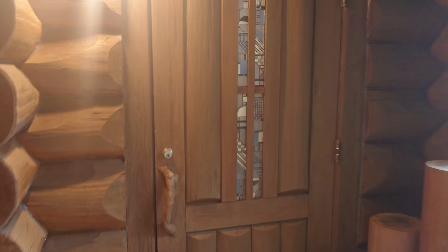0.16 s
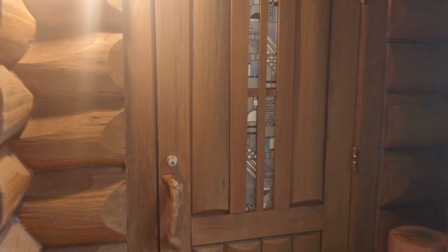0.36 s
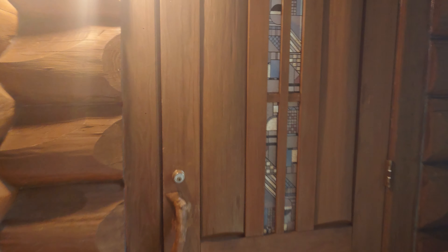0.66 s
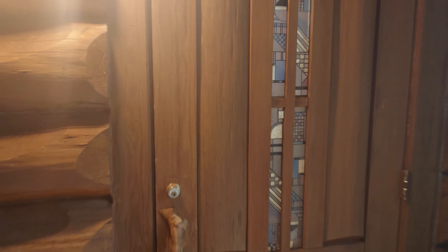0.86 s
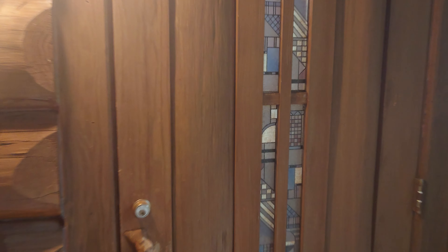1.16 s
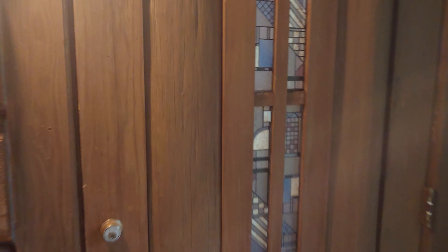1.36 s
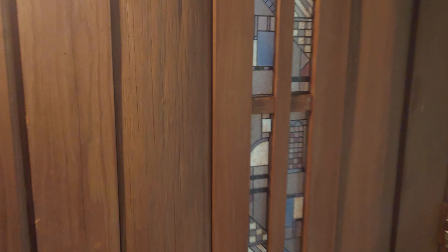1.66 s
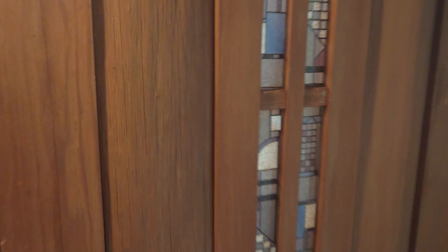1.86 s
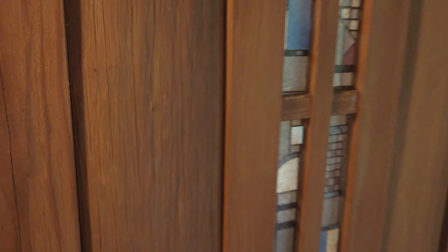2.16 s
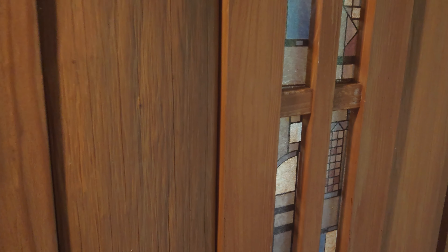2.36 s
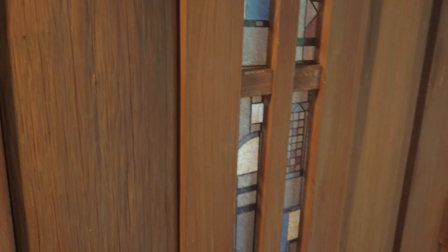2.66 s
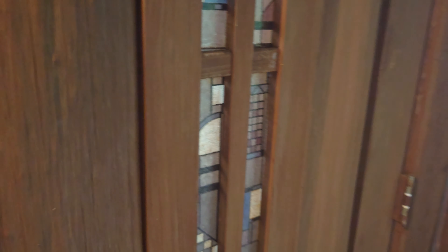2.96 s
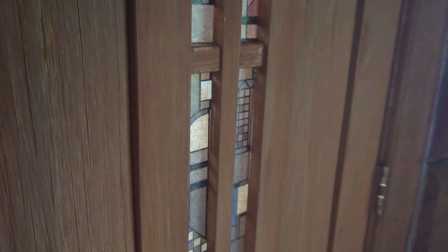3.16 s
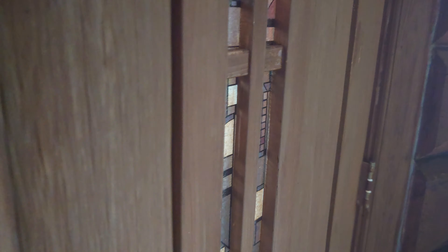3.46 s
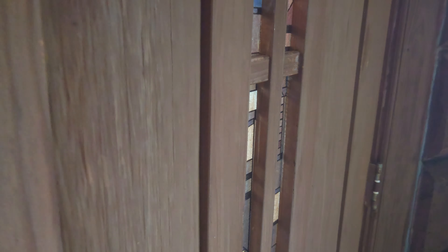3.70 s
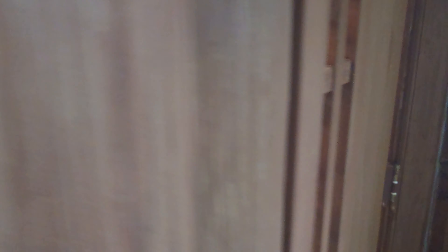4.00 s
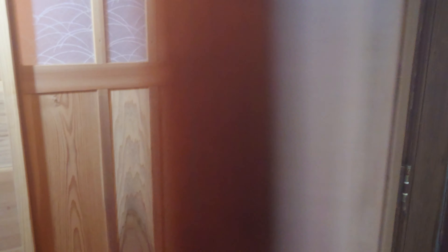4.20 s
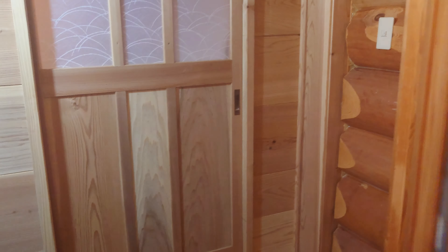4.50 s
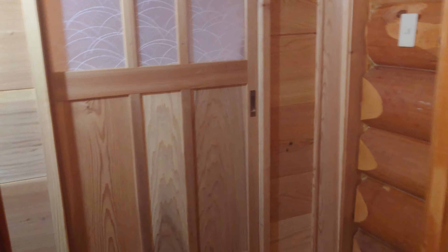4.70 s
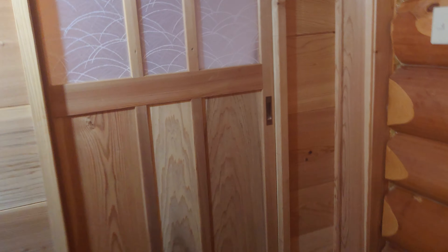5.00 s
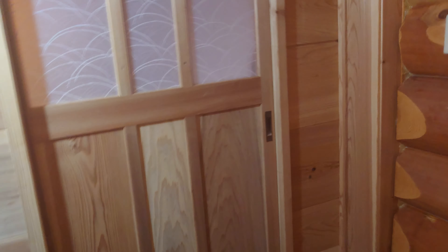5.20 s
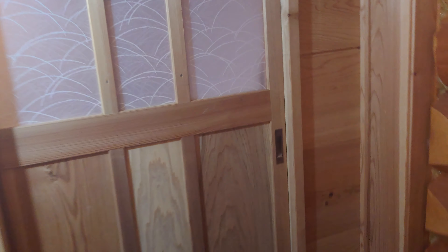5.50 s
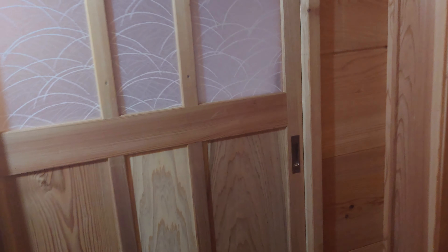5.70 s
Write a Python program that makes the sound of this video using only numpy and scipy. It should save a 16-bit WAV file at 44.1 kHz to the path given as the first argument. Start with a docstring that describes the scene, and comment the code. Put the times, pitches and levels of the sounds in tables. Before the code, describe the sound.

Someone in boots crosses a hollow plank deck, rattles a door latch, opens a briefly squeaking wooden door and steps on with scuffs and knocks.

```python
"""Boots on a cabin porch

Someone in boots walks over a plank porch, works a latch and pulls a heavy wooden door open.
Shaped noise makes knocks, scuffs, latch clatter and rustling clothes; low resonances boom as the deck.
Struck modes ring as boards, ticks and latch plate; a stick-slip tone squeaks as the hinge.
Short flickering high tones, a narrow hiss and a hand bumping the microphone join a quiet room tone."""
import sys
import numpy as np
from scipy import signal
from scipy.fft import rfft, irfft, next_fast_len
from scipy.io import wavfile
from scipy.ndimage import uniform_filter1d

SR = 44100
rng = np.random.default_rng(int(sys.argv[2]) if len(sys.argv) > 2 else 0)


def wrap_up_sound(samples):
    """Save the sound to the file named by the first command line argument, as 16-bit audio."""
    columns = np.atleast_2d(samples).T
    # keep every value between -1 and 1, then stretch to whole-number steps
    tamed = np.clip(columns, -1, 1)
    steps = np.round(tamed * 32767).astype(np.int16)
    wavfile.write(sys.argv[1], SR, steps)


N = 257984
STEP = 16   # samples between envelope points

# centres of the three contact registers: thud, knock and grit (f/Hz)
REGISTERS_HZ = (300, 1600, 7000)
# where feet and clothes sit as the microphone sways in the hand: t/s, left-right pan/dB
SWAY = [(0, -10), (.5, -13.5), (.75, -6.5), (1.4, -12), (2.3, -11.5), (2.6, -7), (3.7, -4), (4.3, -8),
        (4.8, -13.5), (5.2, -3), (5.5, -10), (5.85, -7.5)]


def amp(db):
    """Decibels to gain."""
    return 10 ** (np.asarray(db) / 20)


def rms_one(x):
    """Scale to unit rms."""
    return x / np.sqrt(np.mean(x ** 2) + 1e-20)


def in_time(rows, outside=None):
    """Columns of a curve at every sample."""
    s, *columns = np.transpose(rows)
    return [np.interp(np.arange(N) / SR, s, c, outside, outside) for c in columns]


def gate(rows, fade_samples):
    """Open from the first to the last row of a curve, with short fades."""
    is_open = in_time([(row[0], 1) for row in rows], outside=0)[0]
    return uniform_filter1d(is_open, size=fade_samples)


def at_hz(points, hz):
    """Read a spectrum on a log-frequency axis."""
    point_hz, level_db = np.array(points)[:, 0], np.array(points)[:, 1]
    return np.interp(np.log(hz), np.log(point_hz), level_db)


def sides(pan_db):
    """Left and right gains for a left-right level difference."""
    return amp(np.array([[.5], [-.5]]) * pan_db)


def flicker(shape, smooth):
    """Low-passed random wavering of rms 1."""
    return rms_one(signal.lfilter([1], [1, -smooth], rng.standard_normal(shape)))


def swell(t, s, rise_db_per_s, fall_db_per_s, hold_s=0.0):
    """Level in dB that climbs to 0 at s, holds, then sinks."""
    climb = -rise_db_per_s * np.maximum(s - t, 0)
    return climb - fall_db_per_s * np.maximum(t - s - hold_s, 0)


def ring(x, hz, t60):
    """A decaying two-pole mode: a unit click sets a sine of height 1 ringing."""
    r, w = amp(-60 / (t60 * SR)), 2 * np.pi * hz / SR
    return signal.lfilter([0, np.sin(w)], [1, -2 * r * np.cos(w), r * r], x + 1e-18)


def resonate(x, hz, width_hz):
    """Two-pole resonance with gain 1 on top."""
    r = np.exp(-np.pi * width_hz / SR)
    poles = [1, -2 * r * np.cos(2 * np.pi * hz / SR), r * r]
    return signal.lfilter([(1 - r * r) / 2, 0, (r * r - 1) / 2], poles, x)


def blow(s, level_db, hz, t60, contact_s):
    """One mode struck by a contact that lasts a moment; longer contacts strike softer."""
    out, i = np.zeros(N), round(s * SR)
    click = np.zeros(min(SR, N - i))
    soft = np.hanning(int(contact_s * SR) + 3)
    click[:len(soft)] = -amp(level_db) * soft / soft.sum()
    out[i:i + len(click)] = ring(click, hz, t60)
    return out


def bands(envelope_at, grain_db):
    """Third-octave bands of grainy stereo noise, shaped before the filter so that each band rings on."""
    # how alike the two sides are: f/Hz, correlation (0-1)
    side_likeness = [(40, 0.48), (300, 0.79), (1500, 0.022), (8000, 0.039)]
    # the two microphone ports differ: f/Hz, left-right difference/dB
    port_lean = [(100, 4.5), (500, 8), (2000, -4.5), (4000, -10), (8000, -4), (13000, 4)]
    out, edges = 0, 56 * 2 ** np.arange(0, 8.4, 1 / 3)   # Hz
    grain_gain = amp(grain_db * np.minimum(rng.exponential(1, N), 4))
    grains = rms_one(rng.standard_normal((2, 2, N)) * grain_gain)
    for k, (low, high) in enumerate(zip(edges, edges[1:])):
        hz = np.sqrt(low * high)
        alike = np.clip(at_hz(side_likeness, hz), 0, 1)
        mid, side = grains[k % 2]   # neighbouring bands take different noise
        pair = (np.sqrt(1 + alike) * mid + np.sqrt(1 - alike) * side * [[1], [-1]]) / np.sqrt(2)
        shaped = pair * envelope_at(hz) * sides(at_hz(port_lean, hz))
        band = signal.butter(2, [low, high], "band", fs=SR, output="sos")
        out = out + signal.sosfilt(band, shaped)
    return out


def room_tone():
    """Steady air and microphone noise with two faint narrow hums of resonant noise."""
    # colour of the air: f/Hz, relative density/dB
    air_colour = [(35, -30), (60, 3), (168, -7.5), (244, -7), (371, -6), (527, -34.5), (579, -10),
                  (698, -13.5), (2300, -13.5), (3420, -35), (4970, -11), (6580, -57), (9570, -71),
                  (14600, -12), (16000, -66)]
    air = rms_one(bands(lambda hz: amp(at_hz(air_colour, hz)), grain_db=2))
    hum = rms_one(resonate(rng.standard_normal(N), 584, 3.5))
    low_hum = rms_one(resonate(rng.standard_normal(N), 121.2, 5.0))
    return amp(-75.5) * air + amp(-86.5) * hum + amp(-88.5) * low_hum


def rubbing_power():
    """Power of dragging soles and rustling clothes in the three registers, before colouring."""
    # soles dragging over the planks: t/s of the top, low level/dB, middle level/dB re low
    sole_drags = [(.8, -63, -11), (1.4, -63.5, -12), (2.82, -56.5, -17), (4.42, -60.5, -8),
                  (4.71, -64, -26), (4.92, -69, -1.5), (5.62, -52, 1.5), (5.741, -87, 22)]
    # clothes rustling, high register: t/s, level/dB
    rustle_curve = [(0, -89), (.42, -85.5), (.7, -69), (1.04, -84), (1.4, -75.5), (1.61, -83), (2.23, -93),
                    (2.64, -82.5), (3.06, -100), (3.36, -92), (3.46, -64.5), (3.53, -83.5), (3.84, -85.5),
                    (4.42, -100), (4.58, -75.5), (4.75, -86.5), (5.3, -80.5), (5.62, -64.5), (5.74, -67.5),
                    (5.85, -91.5)]
    drag_rise_db_per_s, drag_fall_db_per_s, drag_rest_db = 143, 127, -81.5
    # middle register at mean rustle, and the share of the rustle's swing that it follows
    rustle_middle_db, middle_follows = -74, 0.3
    t, rustle_db = np.arange(0, N, STEP) / SR, in_time(rustle_curve)[0][::STEP]
    low = amp(2 * drag_rest_db) + 0 * t
    middle = amp(2 * (rustle_middle_db + middle_follows * (rustle_db - rustle_db.mean())))
    for s, low_db, middle_db in sole_drags:
        drag = amp(2 * (low_db + swell(t, s, drag_rise_db_per_s, drag_fall_db_per_s)))
        low, middle = low + drag, middle + drag * amp(2 * middle_db)
    rub_sides = sides(2 * -2.5)   # pan of -2.5 dB; doubled decibels because these are powers
    high = amp(2 * rustle_db) * sides(2 * in_time(SWAY)[0][::STEP])
    return np.array([low * rub_sides, middle * rub_sides, high])


def contacts():
    """All wood, latch and door contacts as (t/s, level/dB, thud/dB, grit/dB, pan/dB)."""
    # soles and knuckles on wood: t/s, nominal level/dB, thud/dB re level, grit/dB re level
    wood_knocks = [(0.084, -41.5, -17, -8.5), (0.494, -65.5, -14, 3.5), (0.615, -45, 7.5, -16),
                   (0.638, -52.5, -11, -2.5), (0.729, -37, -5.5, -9), (0.748, -53.5, -10, 5),
                   (0.79, -34, -6.5, -6.5), (0.828, -34.5, -11, -7), (1.248, -54.5, -9, -22),
                   (1.299, -39, -10.5, -3), (1.49, -35.5, -22.5, -12.5), (1.871, -69, 11, 0),
                   (1.908, -57, -7, -47), (2.308, -50, -4, -51), (2.563, -60, -10, -57),
                   (3.689, -41.5, -5.5, -21), (3.705, -52.5, 3.5, 0), (3.77, -57.5, -10, 3),
                   (4.221, -51, -2.5, -51), (4.266, -52.5, 0, -48), (4.335, -51.5, 8.5, -47),
                   (4.382, -54, 8.5, -42), (4.562, -55, -12, -11), (4.77, -53.5, 5.5, -6.5),
                   (4.866, -57, -21, -15.5), (4.908, -50, -27, -12.5), (4.945, -63, 7, -31),
                   (5.091, -55, 1, -43), (5.261, -70, 11.5, 14), (5.45, -51, 4, -18.5),
                   (5.53, -43, 1.5, -33), (5.568, -66, -11, -11), (5.596, -29.5, -10, -13.5),
                   (5.684, -30, -17.5, -14)]
    # latch parts hitting each other: t/s, nominal level/dB, grit/dB re level
    latch_hits = [(2.691, -42.5, -53.5), (2.721, -33.5, -30), (2.735, -24.5, -20), (2.77, -18, -13.5),
                  (2.789, -20, -15.5), (2.801, -19.5, -5.5), (2.819, -31, -7), (2.829, -29.5, -20),
                  (2.842, -42, -5.5), (2.896, -40, -20.5)]
    # the door jerks on its hinge: t/s, nominal level/dB, grit/dB re level
    door_jerks = [(3.302, -35.5, -50), (3.491, -53, -4.5)]
    latch_thud_db, latch_pan_db = -16.5, -7.5
    jerk_thud_db, jerk_pan_db = -34, -1
    return ([(*row, np.interp(row[0], *np.transpose(SWAY))) for row in wood_knocks]
            + [(s, db, latch_thud_db, grit_db, latch_pan_db) for s, db, grit_db in latch_hits]
            + [(s, db, jerk_thud_db, grit_db, jerk_pan_db) for s, db, grit_db in door_jerks])


def contact_levels(crack_db=-2.0, crack_s=0.002, rise_s=0.0026, treble_decay=0.13, base_db=7.0):
    """Level in dB of thud, knock and grit: a crack and a dying crunch per contact; rubbing fills the gaps."""
    # how far each register follows the pan: share for thud, knock, grit
    pan_share = (0.64, 0.25, 1)
    # unevenness of each register: rms/dB for thud, knock, grit
    clump_db = (3.0, 2.0, 1.0)
    # knock decay at -40 dB with grit at -15 dB; louder and grittier contacts die sooner
    contact_t60_s, shorter_per_level_db, shorter_per_grit_db = 0.24, 0.0262, 0.0138
    t = np.arange(int(.6 * SR / STEP)) * STEP / SR
    power = rubbing_power()
    for s, level_db, thud_db, grit_db, pan_db in contacts():
        shorter = shorter_per_level_db * (level_db + 40) + shorter_per_grit_db * (grit_db + 15)
        t60 = contact_t60_s * np.exp(-shorter)
        i = round(s * SR / STEP)
        for k, offset_db in enumerate((thud_db, 0, grit_db)):
            # highs die sooner
            fade = max(t60, .02) * (REGISTERS_HZ[1] / REGISTERS_HZ[k]) ** treble_decay
            crunch = amp(-120 * t / fade)
            crack = amp(2 * crack_db) * np.exp(-2 * t / crack_s)
            onset = 1 - np.exp(-t / rise_s)
            shape = (crunch + crack) * onset * amp(2 * (level_db - base_db + offset_db))
            panned = shape * sides(2 * pan_share[k] * pan_db)
            power[k, :, i:i + len(t)] += panned[:, :power.shape[2] - i]
    clumps = flicker((3, 1, power.shape[2]), .93)   # clumps a few ms long
    return 10 * np.log10(power) + np.reshape(clump_db, (3, 1, 1)) * clumps


def register_weights(hz):
    """How much thud, knock and grit count at this frequency."""
    return [np.interp(np.log(hz), np.log(REGISTERS_HZ), row) for row in np.eye(3)]


def wood_contacts():
    """Contact and rubbing noise coloured between the registers, plus the planks' resonances."""
    # colour of the contacts: f/Hz, relative density/dB
    wood_colour = [(59, -51), (100, -16.5), (271, -14.5), (398, -11), (583, -10), (891, -10), (1030, -8.5),
                   (1610, -6), (2750, -9), (3540, -20), (4470, -13), (7290, -17.5), (9820, -23),
                   (14400, -16), (16000, -20.5)]
    # resonances of the planks: f/Hz, width/Hz, added level/dB
    plank_peaks = [(400, 19, -11.5), (774, 26, -5.5), (1100, 34, -12.5), (1433, 33, -8), (1730, 15, -11),
                   (2440, 38.6, -11), (4700, 120, -12), (6360, 400, -2.5), (7360, 910, 1)]
    levels_db = contact_levels()
    flat = np.array([at_hz(wood_colour, hz) for hz in REGISTERS_HZ])
    # from a register's level to its density, by its width in Hz
    width_db = 10 * np.log10(SR / 2 / np.array([580, 2800, 12500]))

    def envelope_at(hz):
        """Both sides' gain over time for the band at hz."""
        weight = register_weights(hz)
        colour = at_hz(wood_colour, hz) + np.dot(weight, width_db - flat)
        gain = amp(colour + np.tensordot(weight, levels_db, axes=1))
        return np.repeat(gain, STEP, axis=1)[:, :N]

    crunch = bands(envelope_at, grain_db=2.0)
    return crunch + sum(amp(db) * resonate(crunch, hz, width) for hz, width, db in plank_peaks)


def deck_level():
    """Each landing swings up from rest, holds and dies in two stages."""
    # the body's weight lands on the deck: t/s, drive level/dB, hold/s
    weight_landings = [(0.126, -72, 0.01), (0.668, -36, 0.013), (0.768, -42.5, 0.018), (1.291, -40, .04),
                       (1.36, -42.5, 0.065), (1.904, -55, 0.14), (1.766, -64.5, 0.033), (2.368, -58, 0.12),
                       (2.743, -53, .13), (3.07, -62, 0.025), (3.268, -61.5, 0.088), (3.74, -50, 0.15),
                       (4, -54, 0.023), (4.3, -63.5, 0.077), (4.669, -45.5, 0.0078), (4.778, -49, 0.0079),
                       (4.96, -57.5, 0.052), (5.293, -56.5, 0.028), (5.62, -50, 0.18)]
    rise_s, fall_db_per_s, rest_db = 0.072, 169, -70.5
    settle_db, settle_db_per_s = -20, 41   # a fainter swing dies away more slowly
    t = np.arange(0, N, STEP) / SR
    power = amp(2 * rest_db)
    for s, level_db, hold_s in weight_landings:
        rise = (level_db - rest_db) / rise_s
        main_db = level_db + swell(t, s, rise, fall_db_per_s, hold_s)
        settling_db = level_db + settle_db + swell(t, s, rise, settle_db_per_s, hold_s)
        power = power + amp(2 * main_db) + amp(2 * settling_db)
    return np.interp(np.arange(N) / SR, t, np.sqrt(power))


def deck(side_db=-12.5):
    """Weight shifts shake a few low joist modes, nearly alike on both sides."""
    # joist modes: f/Hz, width/Hz of each of two passes, relative level/dB
    joist_modes = [(24.1, 9, 2), (39.8, 8.6, 0), (57.4, 35, -15.5)]
    push = rng.standard_normal((2, N + SR))   # the first second lets the modes build up
    sway = 0
    for hz, width, db in joist_modes:
        sway = sway + amp(db) * rms_one(resonate(resonate(push, hz, width), hz, width))
    sway = sway[:, SR:]
    # even out the random swell, so that the boom follows the weight
    local_rms = np.sqrt(uniform_filter1d(sway ** 2, int(.07 * SR)))
    mid, side = deck_level() * sway / (local_rms + 0.11)
    return mid + amp(side_db) * side * [[1], [-1]]


def ticks():
    """Struck modes: dry ticks of a few cycles, and boards that ring longer."""
    # dry ticks of planks and fittings: t/s, level/dB, f/Hz, left-right pan/dB
    dry_ticks = [(1.247, -49, 875, 1), (1.264, -60, 743, 10), (1.876, -60, 560, 22), (2.075, -68, 574, 28),
                 (2.111, -64.5, 616, 25), (2.176, -70, 617, 29), (4.265, -54, 362, 2),
                 (4.867, -55, 387, -13), (4.911, -54.5, 416, 22), (4.946, -53, 530, 27),
                 (5.145, -59, 540, 22), (5.212, -58.5, 546, 25)]
    # boards and panels ringing at one pitch: t/s, level/dB, f/Hz, t60/s, left-right pan/dB
    ringing_boards = [(0.086, -46.5, 1624, 0.05, -10), (1.495, -44.5, 1760, 0.044, -19),
                      (1.495, -44.5, 2640, 0.03, -16), (1.303, -42, 6470, 0.018, -22),
                      (2.315, -55, 152.2, 0.68, 0), (2.388, -57.5, 1620, 0.041, -14),
                      (2.693, -53, 1613, 0.068, -12), (3.692, -44, 1550, 0.047, -8),
                      (3.7, -49.5, 295.5, 0.34, -1), (4.39, -52.5, 374.5, 0.36, 4),
                      (5.456, -55, 152.4, 0.64, 4)]
    tick_cycles = 12.6   # cycles until a tick is 60 dB down
    out = 0
    for s, db, hz, pan_db in dry_ticks:
        out = out + sides(pan_db) * blow(s, db, hz, tick_cycles / hz, 0.00024)
    for s, db, hz, t60, pan_db in ringing_boards:
        out = out + sides(pan_db) * blow(s, db, hz, t60, 0.354 / hz)
    return out


def latch_ring():
    """Single modes of the latch plate, each set off by one blow of the bolt."""
    # plate modes: t/s, level/dB, f/Hz, t60/s
    plate_modes = [(2.774, -36, 395, .2), (2.806, -36, 2850, .1), (2.868, -46, 1203, .33)]
    return sum(blow(s, db, hz, t60, 0.7 / hz) for s, db, hz, t60 in plate_modes)


def hinge(rough=.1):
    """Quick regular stick-slips; when strong and weak ones alternate, half-pitch lines appear."""
    # the squeak: t/s, slip rate/Hz, level/dB, strong-weak alternation (0-1)
    hinge_slips = [(3.303, 644, -55.5, 0.32), (3.309, 786, -36.5, 0.53), (3.332, 786, -40.5, 0.25),
                   (3.347, 760, -37, 0.13), (3.362, 793, -36.5, 0.075), (3.375, 825, -39.5, 0.036),
                   (3.393, 843, -38, 0.027), (3.408, 846, -33.5, 0.027), (3.418, 842, -46.5, 0.022),
                   (3.46, 838, -57, .03), (3.56, 835, -77.5, .03)]
    # what the hinge and door radiate: f/Hz, gain/dB
    hinge_body = [(380, -25), (780, -6.5), (1600, 0), (2450, -1), (3300, -20.5), (4200, -23.5), (5000, -40),
                  (7800, -40.5)]
    jitter = 0.0124   # rms share of the slip rate
    on = gate(hinge_slips, 90)
    turning = on > 1e-6
    rate_hz, level_db, alternate = [column[turning] for column in in_time(hinge_slips)]
    count = len(rate_hz)
    phase = 2 * np.pi * np.cumsum(rate_hz * (1 + jitter * flicker(count, .995))) / SR
    out = np.zeros(N)
    for k in range(1, 19):   # partials of half the slip rate
        share = np.clip(alternate, 0, 1) if k % 2 else 1
        uneven = 1 + rough * k * flicker(count, .99) / 2   # higher partials waver more
        gain = amp(level_db + at_hz(hinge_body, k * rate_hz / 2))
        out[turning] += share * uneven * gain * np.sin(k * phase / 2 + rng.uniform(0, 2 * np.pi))
    leaf = signal.butter(6, 7800, fs=SR, output="sos")   # the heavy door leaf radiates little higher
    return signal.sosfilt(leaf, out * on + 1e-18)


def porch(x):
    """Porch echoes: eight feedback delays a side, duller on every round, on a frequency grid."""
    t60_s, cut_hz = 0.38, 3500   # decay in the bass; treble loss per round
    size = next_fast_len(N + SR)
    hz = np.arange(size // 2 + 1) * SR / size
    echoes = np.zeros((2, len(hz)), complex)
    for k, lag in enumerate(np.geomspace(.009, .031, num=16)):   # lag in s
        back = amp(-60 * lag / t60_s) / (1 + 1j * hz / cut_hz) * np.exp(-2j * np.pi * hz * lag)
        echoes[k % 2] += (-1) ** (k // 2) * back / (1 - back)
    return irfft(rfft(x, size) * echoes, size)[:, :N]


def high_tones_and_hiss():
    """Short, thin, flickering sine tones near 11-13 kHz, and a narrow hiss of resonant noise."""
    # two gliding tones, each: t/s, f/Hz, level/dB
    high_tones = [
        [(5.54, 11700, -77), (5.558, 13400, -72), (5.6, 13000, -73)],
        [(5.62, 11369, -79), (5.672, 13100, -67), (5.72, 11500, -80)],
    ]
    # hiss in a narrow high band: t/s, level/dB
    narrow_hiss = [(4.5, -109), (4.608, -75), (4.762, -92), (4.768, -89), (5.042, -87), (5.1, -101)]
    hiss_hz, hiss_width_hz = 10400, 610   # width of each of two passes
    wobble = .015   # rms share of the pitch
    out = 0
    for rows in high_tones:
        hz, level_db = in_time(rows)
        uneven = 1 + 0.54 * flicker(N, 0.97)
        phase = 2 * np.pi * np.cumsum(hz * (1 + wobble * flicker(N, 0.86))) / SR
        out = out + gate(rows, 200) * amp(level_db) * uneven * np.sqrt(2) * np.sin(phase)
    hiss = rng.standard_normal((2, N))
    for _ in range(2):
        hiss = resonate(hiss, hiss_hz, hiss_width_hz)
    return out + amp(in_time(narrow_hiss, outside=-140)[0]) * rms_one(hiss)


def bumps():
    """Soft knocks of a hand straight into the microphone housing, as struck modes."""
    # housing modes: t/s, f/Hz, level/dB, t60/s, left-right pan/dB
    housing_bumps = [(4.66, 44.3, -43, 0.18, -18), (4.7663, 1510, -39.5, 0.007, -26),
                     (4.768, 306, -35.5, 0.023, -13), (4.7744, 464, -24, 0.0082, -24.5),
                     (4.777, 62.5, -34.5, 0.084, -22)]
    out = 0
    for s, hz, db, t60, pan_db in housing_bumps:
        out = out + sides(pan_db) * blow(s, db, hz, t60, 0.28 / hz)   # contact of 0.28 cycle
    return out


def scene():
    """All sources; the hinge and latch plate echo under the porch roof."""
    hinge_pan_db, porch_db, high_pan_db, tone_pan_db = -10, -13.5, -13, -5
    metal = latch_ring() + hinge()
    door = sides(hinge_pan_db) * metal + amp(porch_db) * porch(metal)
    walker = wood_contacts() + deck() * sides(0.073) + ticks()
    high = high_tones_and_hiss() * sides(high_pan_db)
    return room_tone() * sides(tone_pan_db) + walker + door + high + bumps()


def record(dry):
    """The microphone housing dents the response; the deepest bass and the top are cut."""
    # dips of the housing: f/Hz, width/Hz, depth (0-1)
    housing_dips = [(251, 108, 0.48), (8890, 2770, 0.65)]
    for hz, width, depth in housing_dips:
        dry = dry - np.clip(depth, 0, 1) * resonate(dry, hz, width)
    dry = signal.sosfilt(signal.butter(2, 15, "high", fs=SR, output="sos"), dry)
    # 70 dB down from 16.2 kHz up
    return signal.sosfilt(signal.cheby2(16, 70, 16200, fs=SR, output="sos"), dry)


dry = scene()
out = record(dry)
wrap_up_sound(out)
```